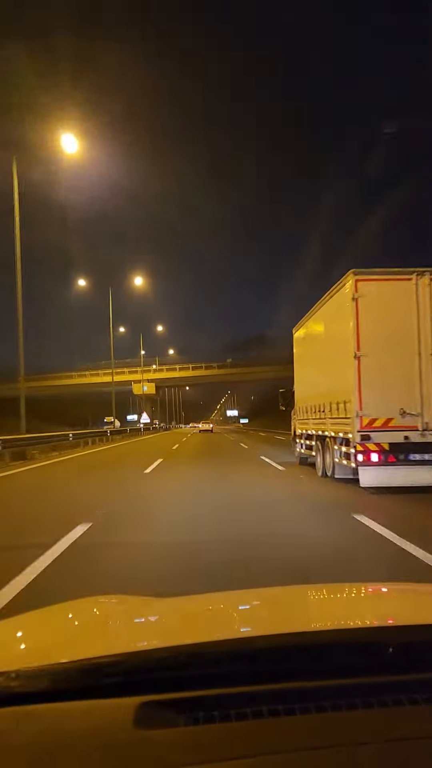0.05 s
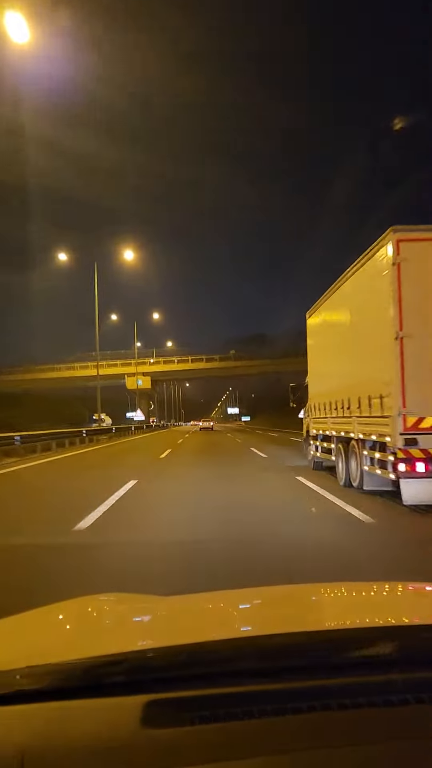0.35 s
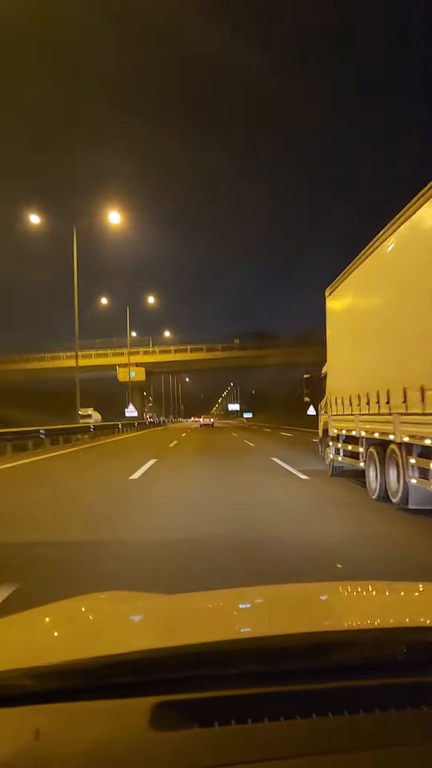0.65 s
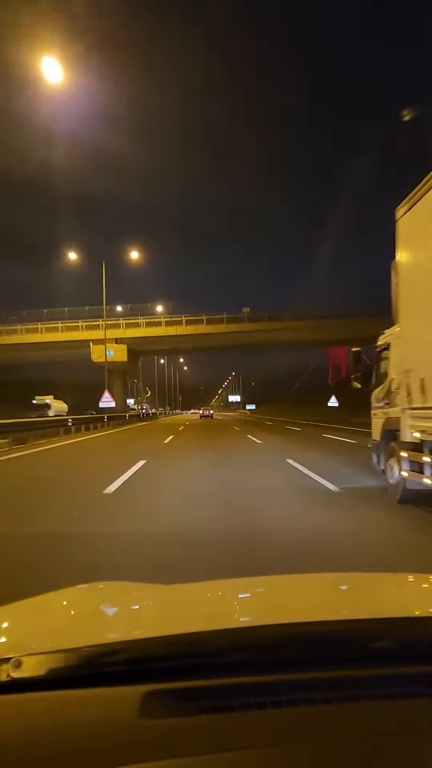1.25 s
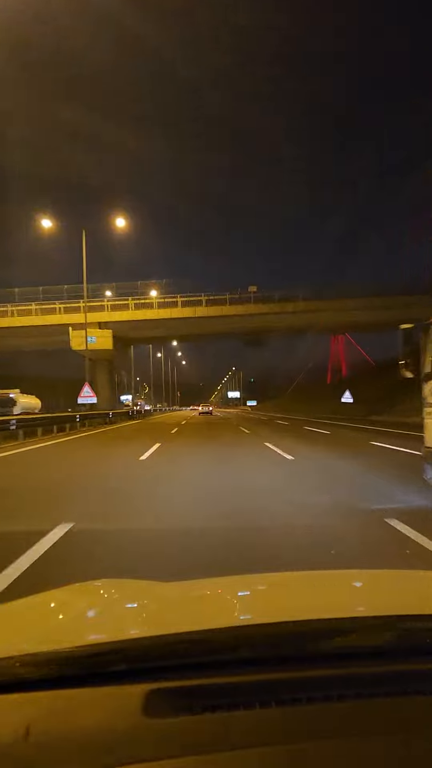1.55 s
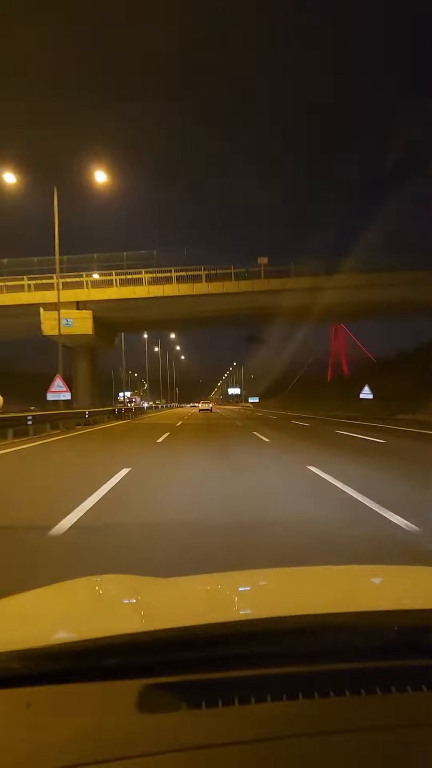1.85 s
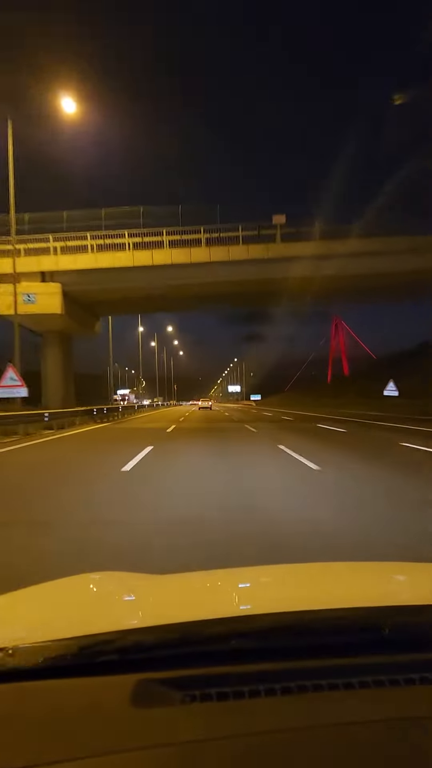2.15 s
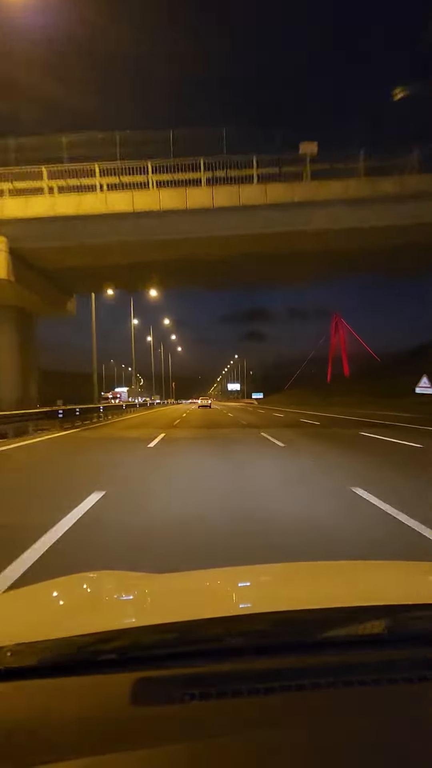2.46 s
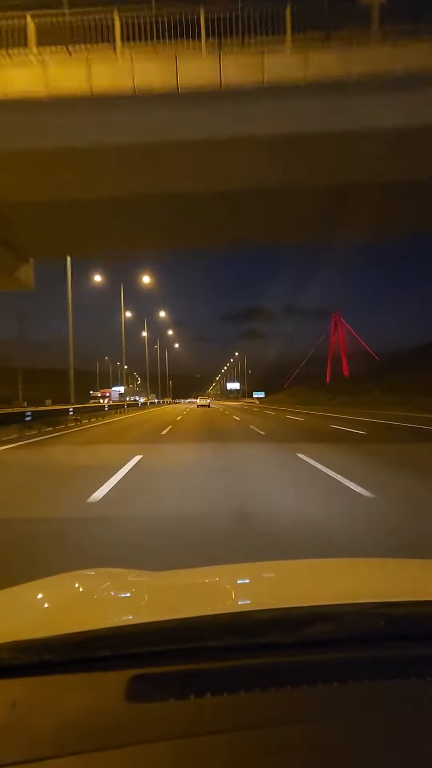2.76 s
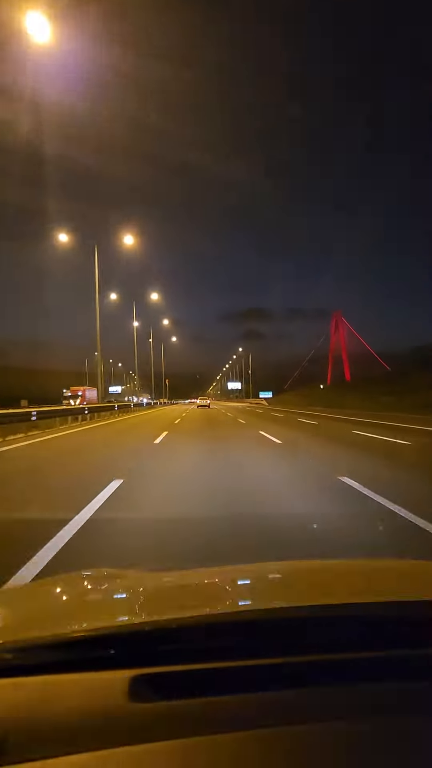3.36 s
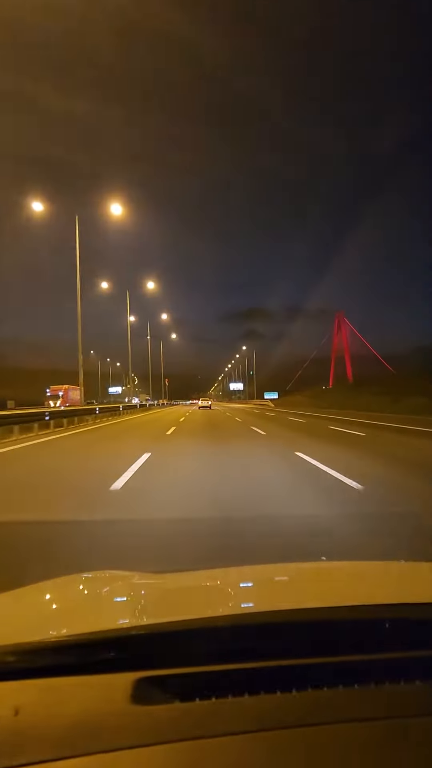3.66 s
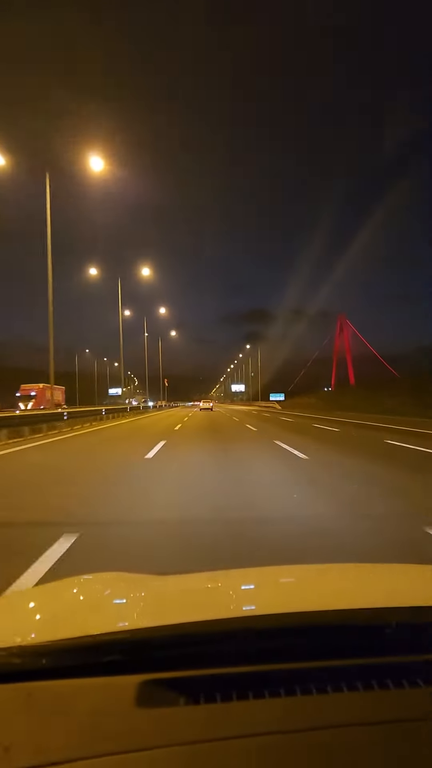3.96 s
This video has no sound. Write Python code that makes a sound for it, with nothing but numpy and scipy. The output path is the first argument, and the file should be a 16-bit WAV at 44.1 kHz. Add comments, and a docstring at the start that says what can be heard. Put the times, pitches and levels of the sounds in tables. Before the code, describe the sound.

Deep cabin rumble of a car cruising on a highway, tyres louder beneath an overpass.

```python
"""Inside a car cruising on a motorway at night. From the start the road shakes the body into a deep
boom, with tyre roar and faint wind hiss above it. Near 1.4 s the car draws past a lorry: the wind sings
a little louder at the window seals and the plastic trim ticks twice. Around 2.5 s a bridge throws the
tyre noise back and briefly raises a drone, with bright hiss going in and coming out. The seals swell
again on the way out, and the open road returns."""
import sys
import numpy as np
from scipy import signal
from scipy.fft import rfft, irfft
from scipy.io import wavfile

SR = 44100
rng = np.random.default_rng(int(sys.argv[2]) if len(sys.argv) > 2 else 0)


def pcm_store(signal):
    """Save signal as 16-bit PCM."""
    levels = np.round(np.clip(np.atleast_2d(signal), -1, 1) * 32767)
    wavfile.write(sys.argv[1], SR, levels.astype(np.int16).T)


N = 176400
TIME = np.arange(N) / SR
FREQS = np.maximum(np.arange(N // 2 + 1) * SR / N, 1)

# low resonances of the body, then higher ones of the cabin air: f/Hz, width/Hz, level/dB
BODY_MODES = [(19, 4, -30.5), (37.5, 10, -17.8), (66, 7, -22.9)]
CABIN_MODES = [(125.6, 19.2, -34), (165.7, 22.4, -37.5), (201.7, 10, -41.5)]
# how hard the road shakes them: t/s, relative level of the deepest two/dB, of the others/dB
ROAD_SHAKE = [(0, -1, -1), (.35, 1.5, 0), (.6, .5, -2.5), (.96, 3, -2.5), (1.06, -7, -1), (1.22, 2.5, -.5),
              (1.45, -1.5, 0), (2.05, -.5, -1.5), (2.25, -4, .5), (2.45, -1, .5), (2.7, -4.5, 1.5),
              (3.04, 3, -1), (3.33, 1.5, 0), (3.45, -4, -1), (3.66, -6, 1.5), (3.73, 3, 0), (4, 1, .5)]
BOOM_EVENNESS, BOOM_PAN_DB = .35, .6

# tone of the tyre roar and wind hiss on the open road: f/Hz, relative level/dB
ROAD_SPECTRUM = [(40, 1), (88, 1), (150, -7.5), (270, -10.5), (330, -17.5), (385, -17.5), (570, -16),
                 (680, -24), (900, -23.5), (1120, -29.5), (1300, -29.5), (1550, -35), (2500, -42),
                 (3000, -50), (4000, -52.5), (6000, -60.5), (7800, -51.5), (9800, -76), (11500, -70),
                 (15500, -64)]
# the roar rides up and down with the road surface: t/s, gain/dB
SURFACE_GAIN = [(.8, -0.5), (1.5, 1), (3.3, .5), (4, 2)]
# tone of the roar thrown back by the bridge: f/Hz, relative level/dB
BRIDGE_SPECTRUM = [(40, -13), (75, 3.5), (125, 8), (190, -4.5), (320, -11), (390, -1.5), (550, -4),
                   (670, -9.5), (850, -3.5), (1120, -12), (1300, -13), (1550, -18.5), (2500, -19.5),
                   (3300, -29), (4000, -33), (4800, -30.5), (7800, -35.5), (9800, -46.5), (12000, -43),
                   (15500, -45.5)]
ROAD_DB, BRIDGE_DB = -24, -27.5
ENTER_S, LEAVE_S = 2.37, 2.634
APPROACH_DB_PER_S, RECEDE_DB_PER_S = 17.5, 16
# drone under the bridge: t/s, f/Hz, level/dB
DRONE_CURVE = [(2.2, 224, -50), (2.32, 224, -34), (2.6, 226, -34), (2.72, 226, -28.5), (2.83, 221, -25.5),
               (2.91, 216, -40)]
DRONE_WAVER_HZ, DRONE_WAVER_PER_S, DRONE_FADE_S, DRONE_PAN_DB = 1.75, 8, .06, 1.5

# slips of the trim: t/s, snap level/dB, ring level/dB, left minus right/dB, lag of left/s
TRIM_SLIPS = [(1.4102, -23.5, -48, -3.5, 0), (1.6648, -27.5, -24, 1.5, .00037)]
# ring of the trim: f/Hz, relative level/dB, t60/s
TRIM_MODES = [(4850, -1.5, .003), (5950, -1, .0028), (7350, -3.5, .0028), (11300, -10, .004),
              (13900, -7.5, .0032), (15700, -12, .003)]
SNAP_HZ, SNAP_T60_S = 2400, .0009

# swells of bright hiss at either end of the bridge: t/s, level/dB
HISS_LEVEL = [(0, -65), (1.3, -62.5), (1.7, -57.5), (2.05, -54), (2.5, -60), (2.8, -54), (3.0, -49.5),
              (3.13, -55.5), (3.25, -66), (4, -92)]
# tone of that hiss: f/Hz, relative level/dB
HISS_SPECTRUM = [(1000, -17.5), (2000, -1), (3000, 0), (3800, -3), (5500, -6), (8000, -5), (9800, -19.5),
                 (15500, -29.5)]

# wind singing at the window seals: f/Hz, width/Hz, base level/dB
SEAL_TONES = [(2450, 120, -56.3), (3020, 200, -61.5)]
# the singing swells beside the lorry and on the way out from the bridge: t/s, gain/dB
SEAL_GAIN = [(.9, 0), (1.35, 2.5), (2.15, 0), (2.8, 4.5), (3.1, 5), (3.42, 0)]
# tone of the fine, airy hiss: f/Hz, relative level/dB
AIR_SPECTRUM = [(2000, -13), (4000, 4.5), (7800, 0), (9800, -9.5), (11500, -2.5), (15500, -10)]
# brief puffs of that hiss: t/s, level before the envelope/dB
AIR_PUFFS = [(.682, -60), (2.07, -60)]
AIR_DB, FLUTTER_DB, FLUTTER_PER_S = -60.5, 1.8, 11
PUFF_ATTACK_S, PUFF_DECAY_S = .0015, .028

# narrow resonances of glass and panels that colour the tyre noise: f/Hz, width/Hz, gain/dB
PANEL_MODES = [(375.6, 34, 5.5), (715, 30, 4), (817, 16, 4.5), (1255, 80, 3), (1650, 90, 4.5),
               (1967, 54, 4.5), (2080, 59, -2.5), (2157, 43, 6), (2820, 91, -5.5), (4860, 100, 4)]
RIPPLE_DB, RIPPLE_SPACING_HZ, RIPPLE_CENTRE_HZ = 1.8, 21.95, 1230   # the cabin's many lesser resonances
# where the roar sits in the stereo image: f/Hz, left minus right/dB
ROAR_PAN = [(60, 2), (200, 3), (450, 4.5), (1000, 7), (1300, 1.5), (1700, 6), (2400, 0), (3300, 8),
            (4500, -5), (7500, 6), (9800, -3.5), (13000, 6)]
# how alike the two sides of the cabin sound: f/Hz, coherence/0..1
STEREO_LIKENESS = [(250, 0.98), (550, 0.71), (850, 0.87), (1150, 0), (1600, 0), (2200, 0.7), (3500, 0)]
# how far the left side leads: f/Hz, phase/rad
LEFT_LEAD = [(200, -0.089), (600, 0.29), (860, 0.92), (1150, 0.39), (1650, -1.46), (1950, 0.43),
             (2900, -0.5), (5000, -.3)]


def body_boom():
    """The road shakes the low resonances of body and cabin; the deepest follow the bumps."""
    deep_db, upper_db = in_time(ROAD_SHAKE)
    modes = [from_db(db) * shaken(hz, width) for hz, width, db in BODY_MODES + CABIN_MODES]
    deep = rms_one(from_db(deep_db)) * evened(sum(modes[:2]), BOOM_EVENNESS)
    upper = rms_one(from_db(upper_db)) * sum(modes[2:])
    return pan(BOOM_PAN_DB) * evened(deep + upper, BOOM_EVENNESS)


def tyre_roar(colour):
    """Tyres rolling on the road lay a steady bed of roar, with wind hiss on top."""
    surface_db, = in_time(SURFACE_GAIN)
    return from_db(ROAD_DB + surface_db) * diffuse(ROAD_SPECTRUM, colour * pan(over_hz(ROAR_PAN)))


def bridge_reflection(colour):
    """Reflected roar swells on the approach, holds under the deck and falls away behind."""
    approach_db = APPROACH_DB_PER_S * np.maximum(ENTER_S - TIME, 0)
    recede_db = RECEDE_DB_PER_S * np.maximum(TIME - LEAVE_S, 0)
    roar = diffuse(BRIDGE_SPECTRUM, colour * pan(over_hz(ROAR_PAN)))
    return from_db(BRIDGE_DB - approach_db - recede_db) * roar


def bridge_drone():
    """A wavering tone builds under the bridge, then sags and dies on the way out."""
    hz, db = in_time(DRONE_CURVE)
    phase = 2 * np.pi * np.cumsum(hz + DRONE_WAVER_HZ * drift(DRONE_WAVER_PER_S)) / SR
    outside_s = np.abs(TIME - np.clip(TIME, DRONE_CURVE[0][0], DRONE_CURVE[-1][0]))
    envelope = from_db(db) * np.exp(-outside_s / DRONE_FADE_S)
    return pan(DRONE_PAN_DB) * envelope * np.sqrt(2) * np.sin(phase)


def trim_ticks():
    """Each slip of plastic is a sharp snap that sets the trim ringing for a few milliseconds."""
    ticks = np.zeros((2, N))
    for start, snap_db, ring_db, pan_db, lag in TRIM_SLIPS:
        since = TIME - start - np.array([[lag], [0]])
        age = np.maximum(since, 0)
        fall = -np.log(1000) * age   # 60 dB down after one t60
        snap = (since >= 0) * np.exp(fall / SNAP_T60_S) * np.cos(2 * np.pi * SNAP_HZ * age)
        ring = sum((-1) ** k * from_db(db) * np.exp(fall / t60) * np.sin(2 * np.pi * hz * age)
                   for k, (hz, db, t60) in enumerate(TRIM_MODES))
        ticks += pan(pan_db) * (from_db(snap_db) * snap + from_db(ring_db) * ring)
    return ticks


def window_hiss(colour):
    """Bright tyre hiss, just right of centre, swells before the bridge and again after it."""
    db, = in_time(HISS_LEVEL)
    return from_db(db) * diffuse(HISS_SPECTRUM, colour * pan(db=-.5))


def wind():
    """Gusty air sings faintly at the seals, over a fine hiss with two short puffs."""
    gust = from_db(FLUTTER_DB * drift(FLUTTER_PER_S))
    seals = sum(from_db(db) * np.array([shaken(hz, width), shaken(hz, width)])
                for hz, width, db in SEAL_TONES)
    air_level = from_db(AIR_DB) * gust
    for start, db in AIR_PUFFS:
        age = np.maximum(TIME - start, 0)
        air_level += from_db(db) * (1 - np.exp(-age / PUFF_ATTACK_S)) * np.exp(-age / PUFF_DECAY_S)
    swell_db, = in_time(SEAL_GAIN)
    return gust * from_db(swell_db) * seals + air_level * diffuse(AIR_SPECTRUM, colour=1)


def cabin_colour():
    """The cabin as an EQ: panel peaks and dips, plus a fine random ripple for each side."""
    panel_db = sum(db / (1 + (2 * (FREQS - hz) / width) ** 2) for hz, width, db in PANEL_MODES)
    knots = rng.standard_normal((2, N // 20))
    ripple = np.array([np.interp(FREQS / RIPPLE_SPACING_HZ, np.arange(len(k)), k) for k in knots])
    ripple_db = RIPPLE_DB * ripple / np.cosh(np.log(FREQS / RIPPLE_CENTRE_HZ))
    return from_db(panel_db + ripple_db)


def diffuse(spectrum, colour):
    """Noise filling the cabin, nearly mono in the bass and wide in the treble; rms 1."""
    mid, side = rfft(rng.standard_normal((2, N)))
    alike = over_hz(STEREO_LIKENESS)
    signs = np.array([[1], [-1]])
    pair = np.sqrt(1 + alike) * mid + signs * np.sqrt(1 - alike) * side
    phase_shift = np.exp(.5j * signs * over_hz(LEFT_LEAD))
    low_cut = 1 / (1 + (20 / FREQS) ** 4)   # rolls off below 20 Hz
    return rms_one(irfft(pair * phase_shift * colour * low_cut * from_db(over_hz(spectrum)), N))


def shaken(hz, width_hz):
    """A resonance driven by random jolts, with steep skirts; rms 1."""
    response = 1 / (1 + 1j * (FREQS ** 2 - hz ** 2) / (2 * FREQS * width_hz))
    return rms_one(irfft(rfft(rng.standard_normal(N)) * response ** 2, N))


def evened(x, share):
    """Compress a share of the swings in level and keep the rms."""
    envelope = np.abs(signal.hilbert(rms_one(x)))
    return np.std(x) * rms_one(x / (envelope ** 2 + .5) ** (share / 2))


def drift(per_s):
    """Slow random wandering; rms 1."""
    return rms_one(irfft(rfft(rng.standard_normal(N)) / (1 + (FREQS / per_s) ** 2), N))


def in_time(rows):
    """Each column of an automation curve at every sample."""
    times, *columns = np.transpose(rows)
    return [np.interp(TIME, times, column) for column in columns]


def over_hz(points):
    """A curve at every frequency, drawn on a log axis."""
    hz, value = np.transpose(points)
    return np.interp(np.log(FREQS), np.log(hz), value)


def pan(db):
    """Left and right gains; positive dB leans left."""
    return from_db(np.array([[.5], [-.5]]) * db)


def from_db(db):
    """Decibels to gain."""
    return 10 ** (np.asarray(db) / 20)


def rms_one(x):
    """Scale to rms 1."""
    return x / np.sqrt(np.mean(x ** 2) + 1e-20)


def scene():
    """The full mix, heard at the dashboard."""
    colour = cabin_colour()
    road = body_boom() + tyre_roar(colour) + bridge_reflection(colour) + window_hiss(colour)
    return road + wind() + bridge_drone() + trim_ticks()


def record(dry):
    """A steep low-pass takes off the top above 15.8 kHz."""
    return signal.sosfilt(signal.ellip(10, .1, 80, 15800, fs=SR, output="sos"), dry)


dry = scene()
out = record(dry)
pcm_store(out)
```